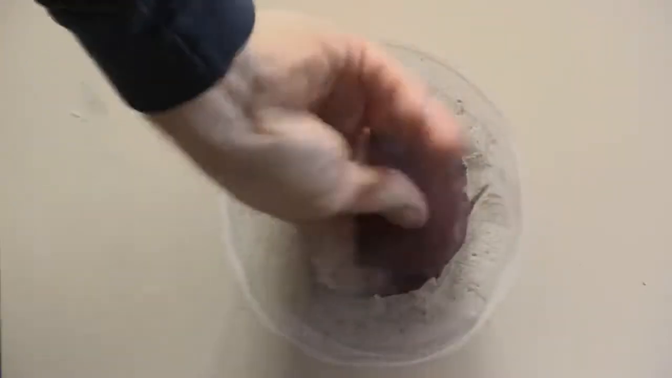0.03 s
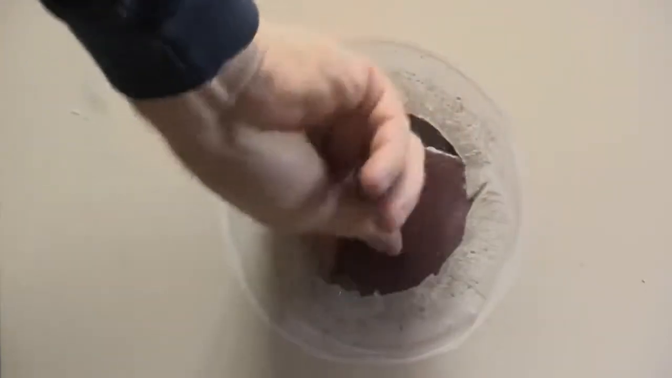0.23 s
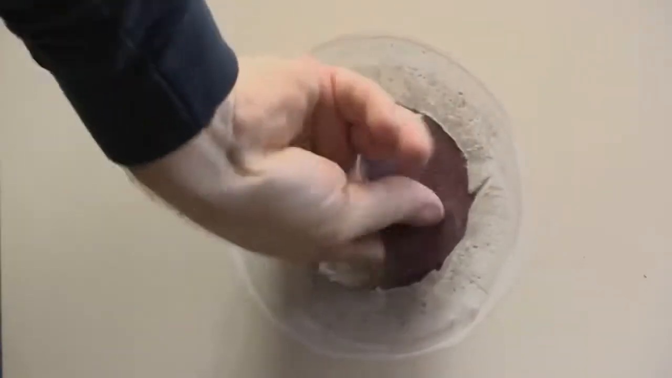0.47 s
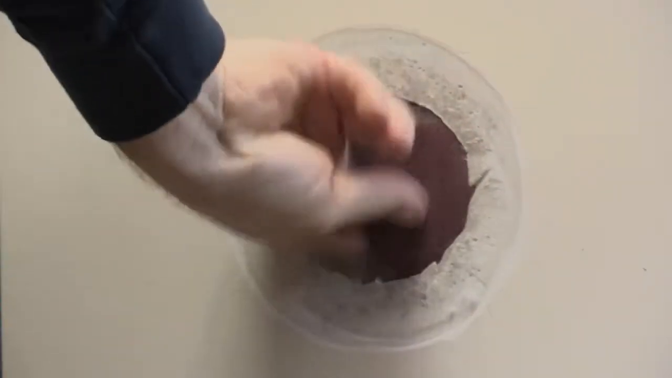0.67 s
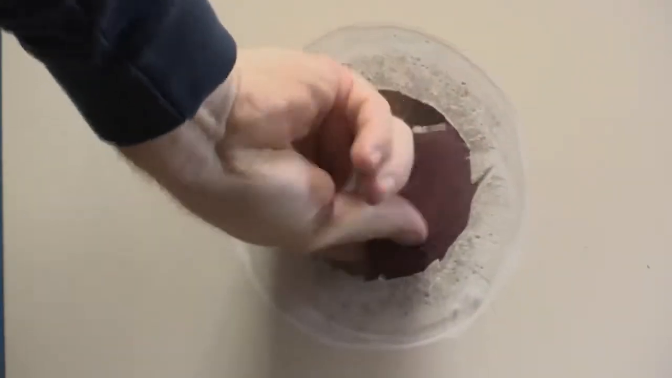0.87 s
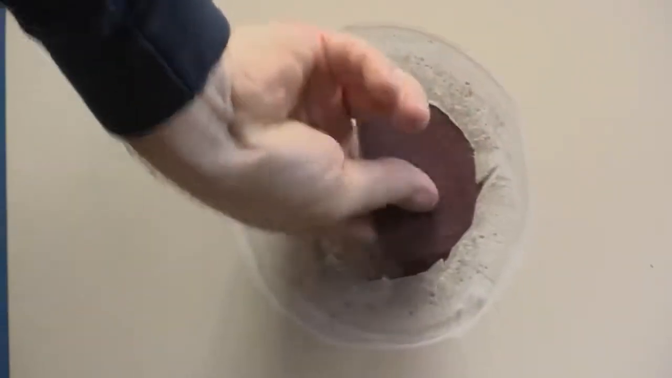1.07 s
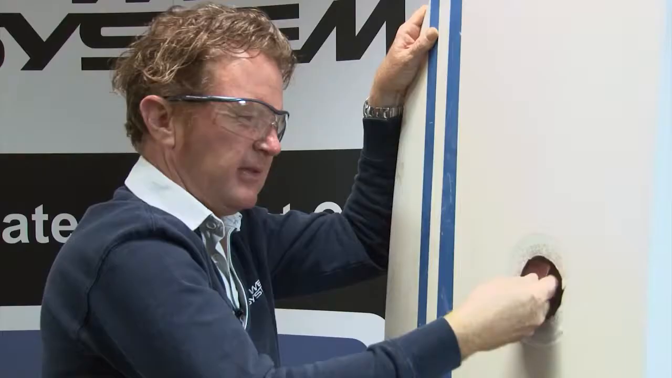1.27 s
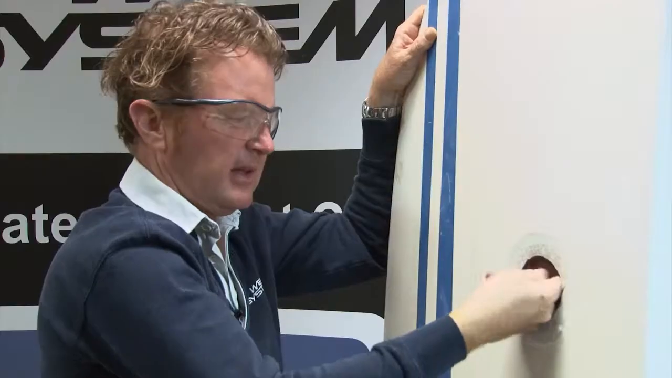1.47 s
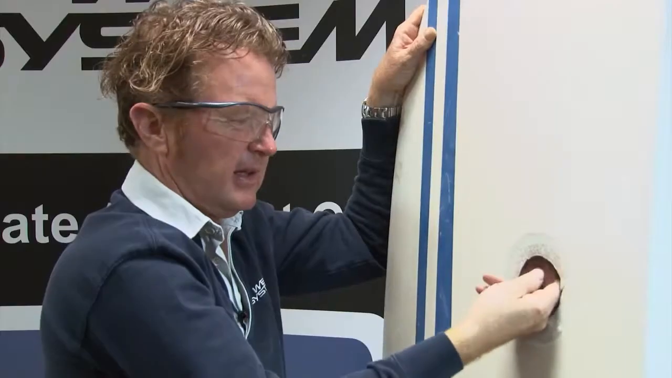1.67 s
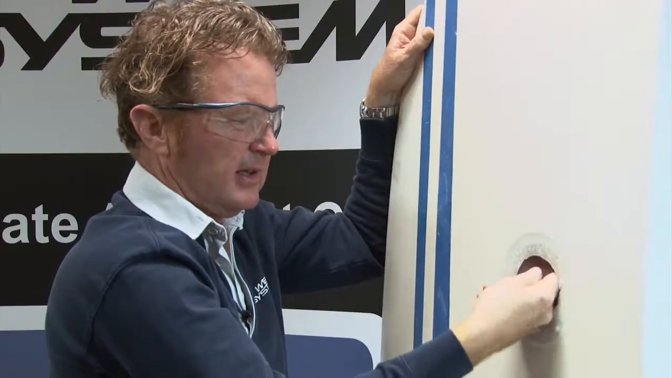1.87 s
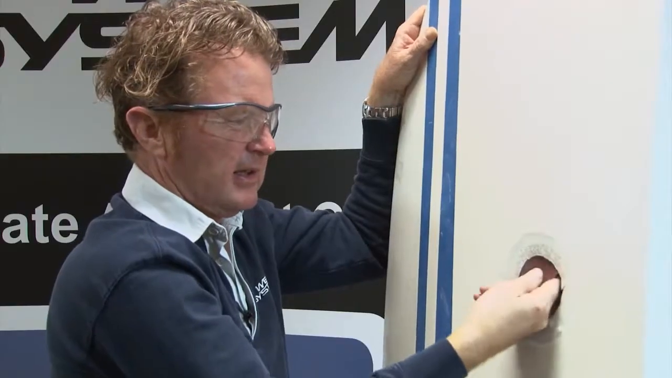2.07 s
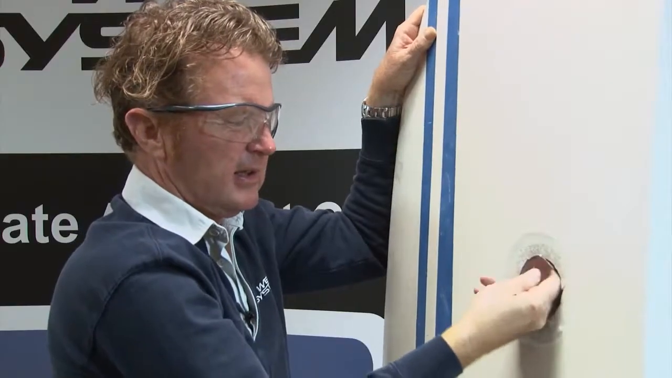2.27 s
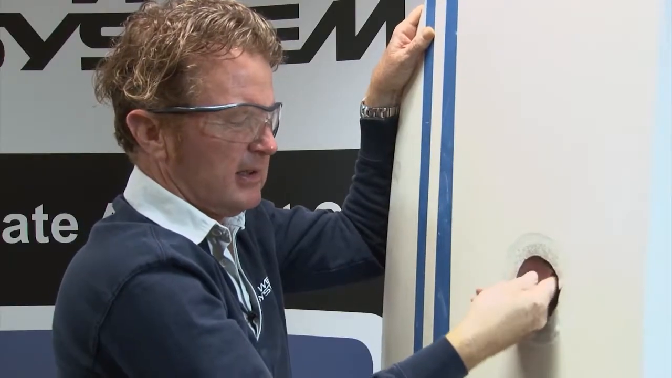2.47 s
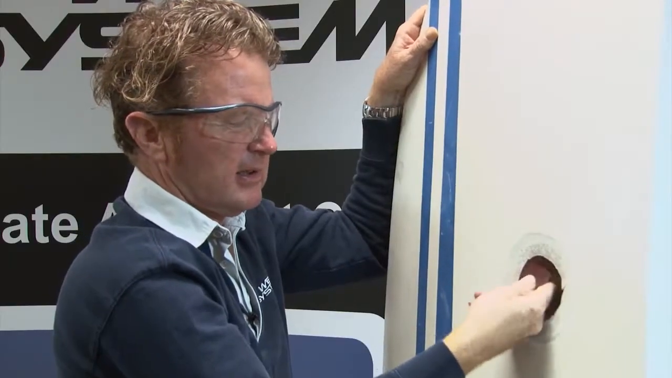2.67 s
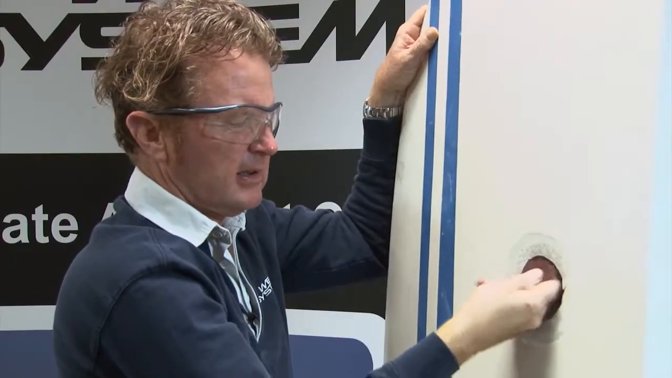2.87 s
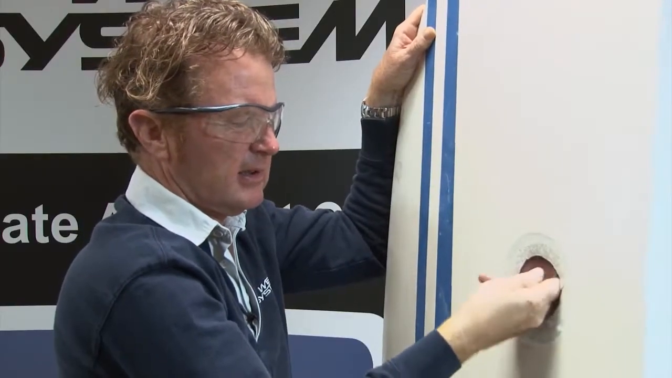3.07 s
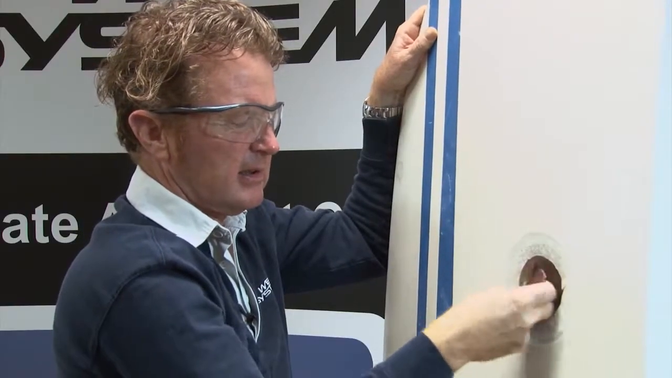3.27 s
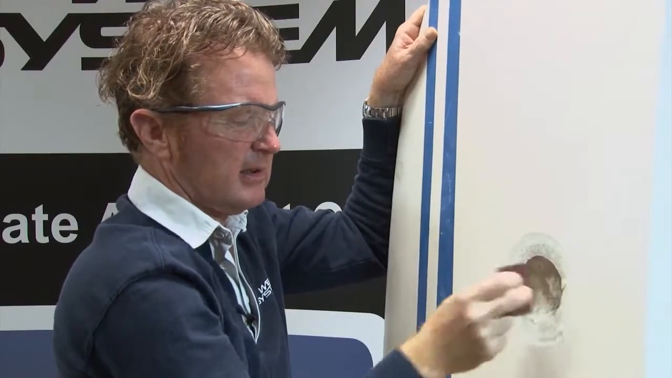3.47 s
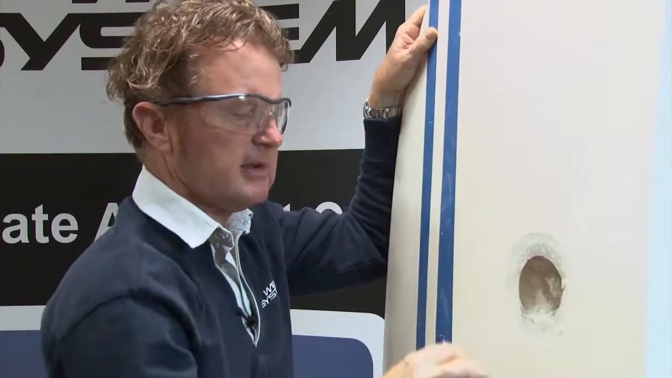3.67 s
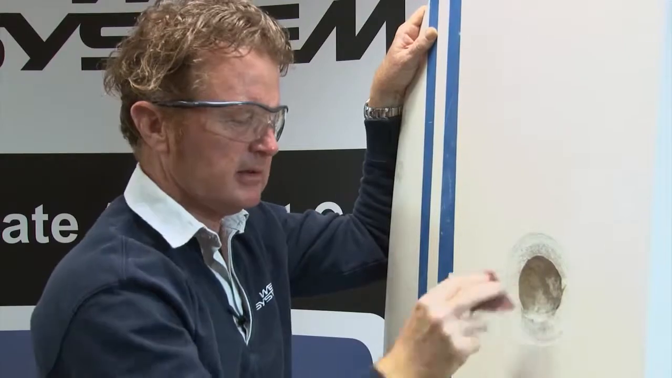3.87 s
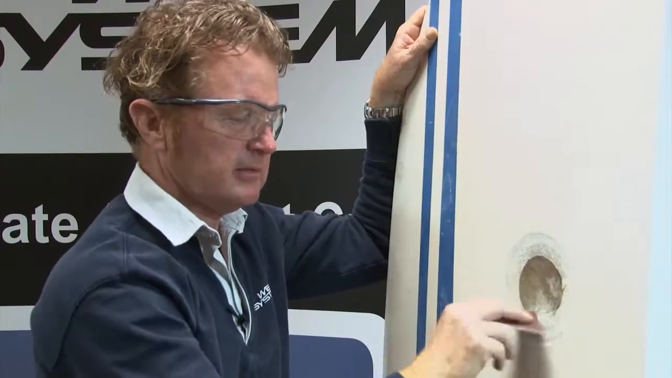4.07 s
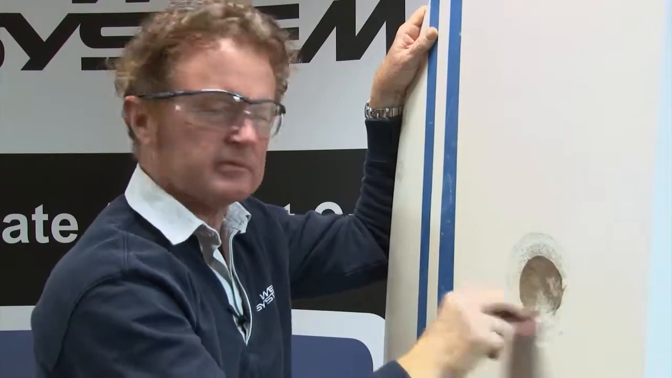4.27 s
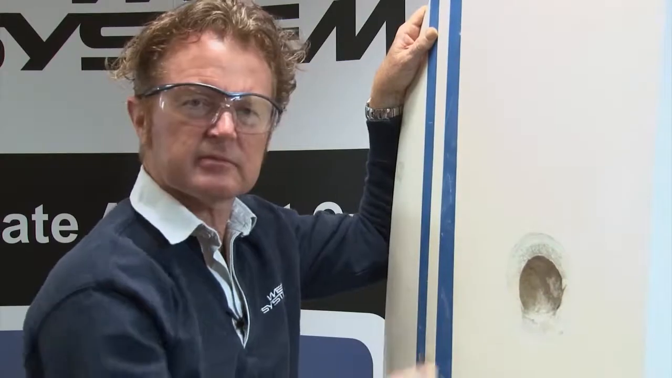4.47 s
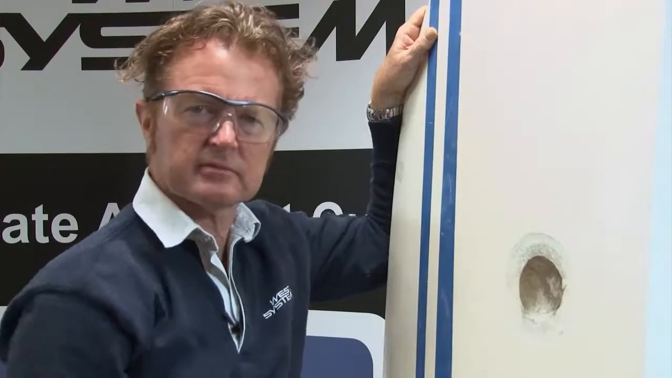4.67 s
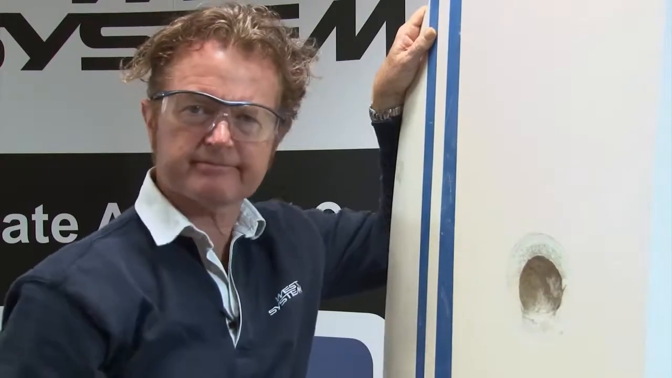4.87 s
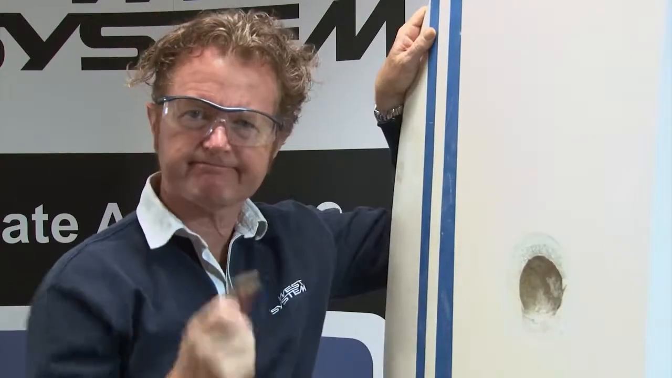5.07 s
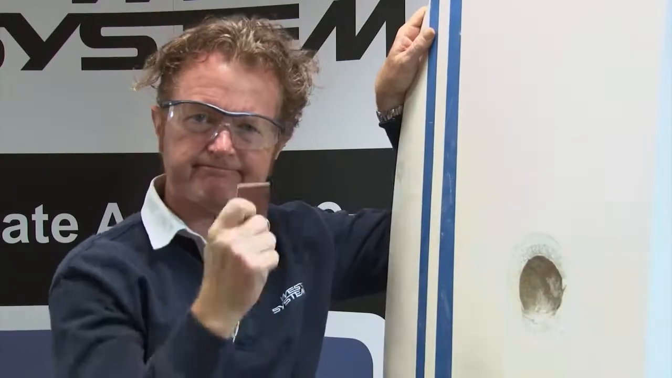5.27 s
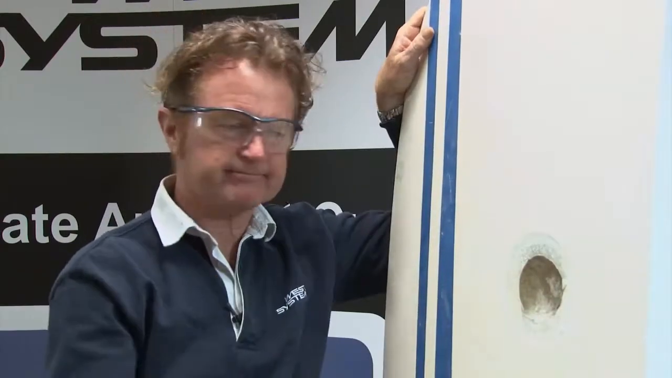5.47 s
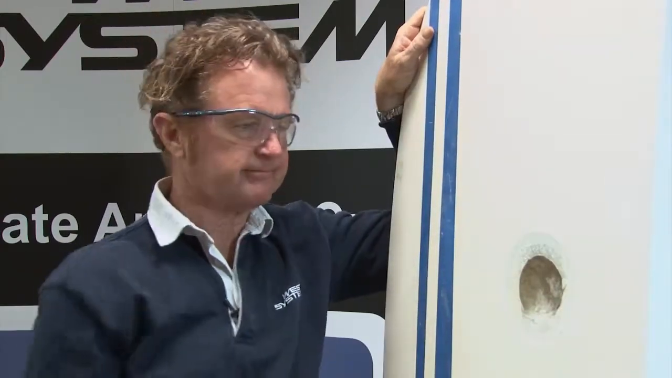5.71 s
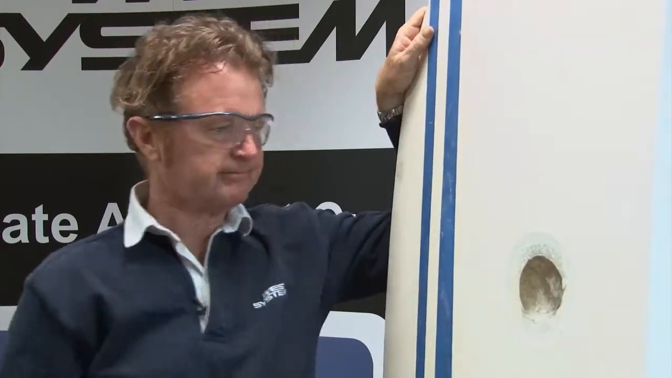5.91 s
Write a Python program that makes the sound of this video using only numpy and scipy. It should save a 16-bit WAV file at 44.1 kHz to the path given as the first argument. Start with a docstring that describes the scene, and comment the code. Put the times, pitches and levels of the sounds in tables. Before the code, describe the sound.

A close chest-worn microphone in a small, slightly echoing workshop with quiet steady hiss. From 0.1 s sandpaper rubs a hard hollow panel in short, irregular gritty strokes, soft at first. From about 0.7 to 1.1 s they are brightest and hissiest, with dull knocks of the panel; until 2.1 s they are weaker and scratchy, with occasional clicks. From 2.15 s the grit catches harder: sharp snaps and hollow, ringing scrapes, strongest around 2.2 and 2.5 s, continuing in separate strokes until 3.5 s. A faint low boom swells and fades beneath. At 3.7 s there is a soft bump and cloth rustle, then a light tap. Two short, hollow wipes come at about 4.15 and 4.35 s, each with a low thud. Afterwards only faint clothing rustle, tiny ticks from 4.7 s, a crisper tick near 5.4 s, and a soft rustling bump at 5.8 s.

```python
"""A hand rubs sandpaper round the ragged edge of a hole in a fibreglass panel, stops, then wipes the edge twice.
Grit catches and slips: one stream of random grains is heard as hiss and rings paper, rim and panel filters.
A low boom swells and fades underneath; bumps and room hiss are filtered noise, and cloth rustle is fine grains.
Ticks, taps and sharp clicks are short noise bursts. A chest-worn microphone hears it all, with a room echo."""
import sys
import numpy as np
from scipy import signal
from scipy.fft import rfft, irfft, next_fast_len
from scipy.io import wavfile
from scipy.ndimage import uniform_filter1d

SR = 44100
rng = np.random.default_rng(int(sys.argv[2]) if len(sys.argv) > 2 else 0)


def bounce(signal):
    """Save signal as a 16-bit WAV file at the path given by the first command-line argument."""
    frames = np.transpose(np.atleast_2d(signal))
    limited = np.clip(frames, -1, 1)
    pcm = np.round(limited * 32767).astype(np.int16)
    wavfile.write(sys.argv[1], SR, pcm)


N = 262152

# Where the paper presses: (time [s], rasp level [dB], panel level against rim [dB],
# tilt of the drive of the paper and rim modes [dB per octave], tilt of the panel's [dB per octave])
SPOT = [(0, -32, 11, -9, -5), (.25, -3, 10, -2, -1.5), (.6, -5, 4.5, -1.5, -5), (.9, -6.5, 1, -3, 1),
        (1.1, -6.5, 3.5, -3.5, 5), (1.4, -4.5, -2.5, 1, 4.5), (1.68, -7, 7.5, 0, 1),
        (1.9, -5.5, -7, 0, -5.5), (2.2, -4.5, -7.5, -5, -4.5), (2.6, -7.5, -6.5, -5.5, -2),
        (3.0, -3.5, -2.5, -1.5, 2), (3.5, 3, 7, 1.5, -1), (4.2, 1.5, 6, 6, 0.5), (4.38, 6, 5, 5, 4.5)]


def amp(db):
    """Turn decibels into gain, as the ear judges loudness by ratios."""
    return 10 ** (np.asarray(db) / 20)


def rms_one(x):
    """Scale a sound to an average strength (rms) of 1."""
    return x / np.sqrt(np.mean(x ** 2) + 1e-20)


def in_time(rows):
    """Draw straight lines between the rows of a time table, giving each column at every sample."""
    s, *columns = np.transpose(rows)
    return np.array([np.interp(np.arange(N) / SR, s, column) for column in columns])


def lag(x, seconds):
    """Smooth a signal so that it takes time to follow a change."""
    r = np.exp(-1 / (seconds * SR))
    return signal.lfilter([1 - r], [1, -r], x)


def flicker(rate):
    """Slow random wandering with a spread of 1; a higher rate [Hz] wanders faster."""
    r = np.exp(-2 * np.pi * rate / SR)
    noise = rng.standard_normal(N + 4000)
    wander = signal.lfilter([1], [1, -2 * r, r * r], noise)
    return rms_one(wander[4000:])  # drop the settling time of the filter


def signs():
    """Random plus or minus for every sample."""
    return rng.choice([-1, 1], N)


def bandpass(x, low_hz, high_hz):
    """Keep mainly the pitches between two frequencies."""
    return signal.sosfilt(signal.butter(2, [low_hz, high_hz], "band", fs=SR, output="sos"), x)


def coloured(x, spectrum):
    """Filter x by a table of pitch and level, falling away steeply outside the table."""
    hz, level_db = np.transpose(spectrum)
    grid = np.log(np.arange(N // 2 + 1) * SR / N + 1e-9)
    below = np.maximum(np.log(hz[0]) - grid, 0)
    above = np.maximum(grid - np.log(hz[-1]), 0)
    gain_db = np.interp(grid, np.log(hz), level_db) - 54 * (below + above)
    return irfft(rfft(x) * amp(gain_db), N)


def resonate(x, modes, tilt_db=0, wander_db=0):
    """Parallel resonances, each driven with its own random signs and by a level that tilts and wanders."""
    out = np.zeros(N)
    middle = np.mean(np.log2(np.array(modes)[:, 0]))
    for hz, width, level_db in modes:
        r = np.exp(-np.pi * width / SR)  # a narrow mode rings longer
        b = (1 - r * r) / 2 * np.array([1, 0, -1])
        a = [1, -2 * r * np.cos(2 * np.pi * hz / SR), r * r]
        octaves = np.log2(hz) - middle
        drive_db = level_db + tilt_db * octaves + wander_db * flicker(7.3)
        out += signal.lfilter(b, a, x * signs() * amp(drive_db))
    return out


def swells(rows):
    """Power of bell-shaped swells, from rows of time, length and level."""
    t = np.arange(N) / SR
    return sum(amp(db) ** 2 * np.exp(-((t - s) / length) ** 2) for s, length, db in rows)


def grit(per_s, spread_db, clump_db):
    """Grains break loose at random with uneven sizes, in clumps a few ms long; rms 1."""
    sizes = amp(spread_db * np.minimum(rng.exponential(1, N), 4)) * signs()
    grains = sizes * (rng.random(N) < per_s / SR)
    return rms_one(grains * amp(clump_db * flicker(190)))


def contact():
    """Strength of hiss, rasp, rim ring and panel ring in time; slips, light drag and knocks add as powers."""
    # slips of the grit: (start [s], length [s], level change over the slip [dB],
    # fine hiss level [dB], ring level [dB])
    slips = [(0.115, 0.014, -21, -49.5, -43), (0.247, 0.032, -18, -50, -45),
             (0.288, 0.052, 0.5, -60, -52.5), (0.399, 0.031, 5.5, -50, -45), (0.495, 0.044, -7, -46, -44.5),
             (0.531, 0.049, 3, -41, -40), (0.611, 0.04, -27, -40.5, -40), (0.675, 0.03, 20, -40, -47),
             (0.708, 0.027, 1, -23.5, -31), (0.754, 0.0048, -3.5, -21, -32), (0.83, 0.03, -3, -24.5, -30.5),
             (0.874, 0.057, -9.5, -40.5, -35.5), (0.993, 0.0018, 0, -39.5, -39),
             (1.003, 0.03, 15.5, -30.5, -37.5), (1.06, .02, -9.5, -24, -29), (1.103, 0.041, -51, -31, -33),
             (1.156, 0.054, 14, -38.5, -39.5), (1.226, 0.032, -8, -38.5, -33.5),
             (1.316, 0.017, -10, -52, -41), (1.341, 0.044, -2, -30, -29), (1.427, 0.018, -31, -28, -57),
             (1.466, 0.031, -4.5, -37.5, -48), (1.51, 0.041, 2, -43, -43), (1.663, 0.023, -14.5, -40, -41),
             (1.741, 0.019, -8, -45, -36.5), (1.776, 0.023, -26, -37, -47), (1.791, 0.058, -12, -42, -43),
             (1.893, 0.018, -14.5, -40, -41), (1.911, 0.05, -3, -40, -38.5),
             (1.991, 0.028, 2.5, -49, -51.5), (2.032, 0.013, 2, -42.5, -34.5),
             (2.091, 0.03, 8.5, -52.5, -52), (2.152, 0.0094, -20.5, -56, -27.5),
             (2.173, 0.011, -13.5, -27.5, -15.5), (2.185, 0.0031, -1, -31, -20.5),
             (2.216, 0.0029, -10.5, -35.5, -9.5), (2.235, 0.0073, -5.5, -16, -11.5),
             (2.3, .025, 11.5, -42.5, -37), (2.324, 0.022, -9, -37, -27.5), (2.351, 0.043, -16, -44, -36),
             (2.38, 0.033, -10.5, -37, -33.5), (2.456, 0.011, -26, -64, -44),
             (2.477, 0.018, -15.5, -23, -11), (2.525, .007, -3, -39, -34.5), (2.582, 0.01, -5, -36, -27),
             (2.664, 0.012, -6.5, -44.5, -41.5), (2.702, 0.016, -17.5, -50, -38),
             (2.739, 0.023, -2, -29.5, -23.5), (2.793, 0.011, -16, -44, -51.5),
             (2.827, 0.016, 6, -54, -46.5), (2.856, 0.0073, -4, -43.5, -35), (2.956, 0.014, 5.5, -36, -24),
             (2.99, 0.022, -13.5, -38.5, -18.5), (3.053, 0.061, -25, -29, -25.5),
             (3.105, 0.063, -9.5, -38.5, -38), (3.178, 0.047, -9, -43, -28), (3.25, 0.035, -1, -40, -31),
             (3.298, 0.014, -14, -40, -29), (3.373, 0.023, -11, -47, -29.5), (3.433, 0.034, -24, -49, -26),
             (3.469, 0.026, -8, -52, -27), (4.125, 0.022, 11, -74, -54.5), (4.153, 0.042, 3, -46, -45),
             (4.183, 0.02, 2, -35.5, -30.5), (4.201, 0.083, -32.5, -38, -30), (4.331, .02, 1, -62, -40),
             (4.353, 0.028, 10.5, -42, -30), (4.369, 0.081, -38, -39.5, -23)]
    # light contact of the paper between slips: (time [s], level [dB])
    drag = [(0, -73.5), (.3, -63), (.66, -56.5), (1.2, -55.5), (1.52, -53), (1.8, -67.5), (2.1, -55.5),
            (2.5, -52.5), (2.9, -58), (3.2, -56), (3.5, -63), (3.62, -75), (4.12, -90), (4.3, -63.5),
            (4.45, -53.5), (4.65, -85)]
    # added to the drag level: one value each for hiss, rasp, rim ring, panel ring [dB]
    drag_parts_db = [-4, -4.5, -2.5, 9]
    # knuckles or the paper's backing push the panel: (time [s], level [dB])
    knocks = [(0.112, -34), (.86, -28.5), (1.08, -27.5), (1.672, -32.5), (1.748, -38), (2.49, -33),
              (3.002, -30.5), (3.39, -38), (4.206, -25), (4.399, -26)]
    rise_s, rise_share = 0.00086, 0.065  # longer slips also set in more slowly
    fall_t60_s, knock_t60_s = 0.041, 0.19  # time to die by 60 dB
    rasp_from_hiss = 0.57  # the rasp starts from a level between hiss and ring

    power = amp(in_time(drag) + np.array(drag_parts_db)[:, None]) ** 2
    rasp_db, panel_db, *_ = in_time(SPOT)
    t = np.arange(int(.3 * SR)) / SR
    for start, length, change_db, hiss_db, ring_db in slips:
        at = round(start * SR)
        change = change_db * np.clip(t / length, 0, 1)
        fall = 60 * np.maximum(t - length, 0) / fall_t60_s
        rise = np.minimum(t / (rise_s + rise_share * length), 1)
        shape = rise * amp(change - fall)
        between_db = rasp_from_hiss * hiss_db + (1 - rasp_from_hiss) * ring_db
        levels_db = [hiss_db, between_db + rasp_db[at], ring_db, ring_db + panel_db[at]]
        power[:, at:at + len(t)] += (amp(levels_db)[:, None] * shape) ** 2
    for s, db in knocks:
        at = round(s * SR)
        power[-1, at:at + len(t)] += amp(db - 60 * t / knock_t60_s) ** 2  # panel only
    return np.sqrt(power)


def patchy(x):
    """The colour shifts as the paper bends: each band's strength wanders by itself."""
    # neighbouring edges of the hiss bands: (edge [Hz])
    edges = [3000, 6780, 8290, 10560, 13500, 17000]
    out = np.zeros(N)
    for k, (low_hz, high_hz) in enumerate(zip(edges, edges[1:])):
        band = amp(1 * flicker(14)) * bandpass(x, low_hz, high_hz)  # wanders by 1 dB
        out += band * (-1) ** k  # turned over so that neighbours add where they meet
    return out


def sanding(strengths):
    """One stream of grains is heard directly as hiss and through the modes of paper, rim and panel."""
    # colour of the hiss: (frequency [Hz], level [dB per Hz])
    hiss_colour = [(3530, -26), (6000, -2.5), (7550, -5.5), (8700, 3), (10600, 1), (13400, -11),
                   (15400, -20.5), (16100, -22.5), (16300, -15)]
    # resonances of paper, rim and panel: (frequency [Hz], width [Hz], level [dB])
    paper = [(2130, 280, 3), (2730, 550, -6.5), (3413, 1300, 4), (4290, 350, 0.5), (5260, 1100, 2),
             (6900, 670, -13)]
    rim = [(670.4, 50, -2), (768, 82, 1.5), (906, 32, -1.5), (960, 110, -5), (1177, 200, -1),
           (1335, 91, -13.5), (1472, 49, -2), (1701, 130, -6.5)]
    panel = [(190.5, 19, -1), (240, 17, -1.5), (276.3, 14, 1), (341, 29, 0), (420.2, 32, -5.5),
             (534, 52, -5.5), (620, 18, -7.5)]
    grip_s = 0.0034  # the paper takes this long to load up
    low_cut_hz = 100  # the scrape has little sound below this

    grains = grit(per_s=9000, spread_db=3.5, clump_db=2.0)
    fine, *pressed = lag(strengths, grip_s)
    out = patchy(coloured(grains * fine, hiss_colour)) / np.std(coloured(grains, hiss_colour))
    *_, upper_db, lower_db = in_time(SPOT)
    tilts_db = [upper_db, upper_db, lower_db]
    for modes, strength, tilt_db in zip([paper, rim, panel], pressed, tilts_db):
        ringing = resonate(grains * strength, modes, tilt_db, wander_db=2.5)
        out += ringing / np.std(resonate(grains, modes))  # level against steady grains
    return signal.sosfilt(signal.butter(3, low_cut_hz, "high", fs=SR, output="sos"), out)


def boom():
    """A low panel boom near 93 Hz, ringing from noise, that swells and fades by its own level table."""
    # the mode: (frequency [Hz], width [Hz], level [dB])
    lowest_mode = [(93, 11, 0)]
    # strength of the boom: (time [s], level [dB])
    boom_levels = [(0, -61), (.3, -45), (.5, -50), (1.6, -58.5), (1.7, -44.5), (1.9, -56), (2.2, -44),
                   (2.7, -46), (3.3, -40.5), (3.8, -68), (4.0, -55.5), (4.3, -54), (4.38, -42),
                   (4.5, -47.5), (4.9, -68.5), (5.94, -65.5)]
    tone = bandpass(resonate(rng.standard_normal(N), lowest_mode), 70, 125)
    nearby_power = uniform_filter1d(tone ** 2, size=1400)
    evened = tone / (nearby_power + 0.12 * np.var(tone)) ** 0.38  # fairly even before the table
    return amp(in_time(boom_levels)[0]) * rms_one(evened)


def bumps():
    """Lumpy low noise through body and cloth, stronger during the first long rubbing, swelling at each bump."""
    # low bumps: (time [s], level at the top of the swell [dB])
    bump_times = [(.15, -41), (.32, -47), (1.39, -45), (2.75, -45), (3.319, -47), (3.67, -43.5),
                  (4.04, -47.5), (4.499, -46.5), (5.25, -46), (5.72, -54), (5.79, -39.5), (5.87, -55)]
    # colour of the low noise: (frequency [Hz], level [dB per Hz])
    rumble_colour = [(8.8, -26.5), (15, 3), (96, -3), (118, -24), (140, -3), (180, -38), (310, -120)]
    bump_s, rubbing_ends_s = 0.042, 3.65
    rubbing_db, later_db = -50, -56.5
    floor_db = np.where(np.arange(N) / SR < rubbing_ends_s, rubbing_db, later_db)
    power = lag(amp(floor_db) ** 2, 0.11)
    power += swells([(s, bump_s, db) for s, db in bump_times])
    noise = rms_one(coloured(rng.standard_normal(N), rumble_colour))
    return np.sqrt(power) * amp(1.5 * flicker(6)) * noise


def room_hiss():
    """Steady room hiss: random noise given a fixed colour."""
    # colour of the room: (frequency [Hz], level [dB per Hz])
    room_colour = [(76, -14.5), (130, -6.5), (268, -1.5), (328, -11), (522, -11.5), (1290, -19.5),
                   (9870, -25), (12300, -30), (13100, -31.5), (14200, -51.5), (16000, -66.5)]
    return amp(-63.5) * rms_one(coloured(rng.standard_normal(N), room_colour))


def cloth():
    """Cloth rustles as the arm moves: clumped fine grains swell and fade."""
    # rustles: (time of the middle [s], length [s], level [dB])
    rustles = [(0.02, 0.017, -61), (3.67, 0.072, -56.5), (3.85, 0.081, -63), (4.55, 0.13, -57),
               (4.75, 0.11, -59.5), (5.1, 0.18, -62.5), (5.42, 0.067, -74), (5.76, 0.027, -56),
               (5.8, 0.055, -61)]
    # colour of the cloth: (frequency [Hz], level [dB per Hz])
    cloth_colour = [(150, 10.5), (400, -2.5), (1100, -6.5), (2200, -9), (5500, -13), (10000, -15),
                    (13000, -23)]
    grains = grit(per_s=9400, spread_db=0.5, clump_db=2.5)
    return np.sqrt(swells(rustles)) * rms_one(coloured(grains, cloth_colour))


def burst(s, peak_db, low_hz, high_hz, decay):
    """A small impact is a short dying burst of band noise at time s."""
    out, at = np.zeros(N), round(s * SR)
    dying = rng.standard_normal(1500) * np.exp(-np.arange(1500) / SR / decay)
    sound = bandpass(dying, low_hz, high_hz)
    out[at:at + 1500] = amp(peak_db) * sound / np.abs(sound).max()
    return out


def ticks():
    """Ticks and taps have a pitch of their own from a narrow band; sharp clicks are broad and dry."""
    # small ticks of paper or cloth:
    # (time [s], peak level [dB], pitch [Hz], decay [s], band edge against pitch [ratio])
    small_ticks = [(3.848, -48, 5800, 0.0029, 1.8), (4.6997, -48.5, 3360, 0.0066, 1.1),
                   (4.773, -47, 3450, 0.0037, 1.04), (4.7975, -46, 3280, 0.0076, 1.13),
                   (4.822, -44, 5220, 0.0054, 1.1), (4.8215, -40.5, 3240, 0.0073, 1.16),
                   (4.863, -53, 5950, 0.0049, 1.1), (4.9488, -46, 3990, 0.0059, 1.6),
                   (5.113, -49, 4170, 0.0038, 1.6), (5.1492, -47, 5100, 0.0052, 1.23),
                   (5.216, -46, 5460, 0.0027, 1.7), (5.3657, -31, 6960, 0.0012, 1.4),
                   (5.4402, -48, 6850, 0.0043, 1.4)]
    # soft finger taps: (time [s], peak level [dB], pitch [Hz], decay [s], band edge against pitch [ratio])
    taps = [(3.802, -45.5, 382, 0.0058, 1.145), (5.011, -51, 380, 0.014, 1.14)]
    # sharp clicks, mostly where a slip of the grit sets in: (time [s], peak level [dB])
    clicks = [(0.2935, -35), (0.4, -30.5), (0.498, -26.5), (0.7587, -28), (0.829, -22), (1.162, -38),
              (1.43, -24.5), (1.7471, -20.5), (1.781, -37), (1.803, -32), (2.194, -16.5), (2.1827, -17),
              (2.237, -18), (2.479, -17), (2.7018, -23), (2.855, -18), (2.963, -26), (3.3776, -15),
              (4.1313, -41), (4.145, -34.5), (4.337, -33), (4.9514, -53)]
    out = np.zeros(N)
    for s, db, hz, decay, ratio in small_ticks + taps:
        ratio = max(ratio, 1.03)  # the narrowest band allowed
        out += burst(s, db, hz / ratio, hz * ratio, decay)
    for s, db in clicks:
        out += burst(s, db, 1200, 13000, decay=0.00085)
    return out


def workshop(x):
    """Room echo: ten feedback delays, weaker and duller on every round."""
    t60_s, wall_cut_hz = 0.27, 1800  # time to die by 60 dB at low pitch; treble is lost above the cut
    size = next_fast_len(N + SR)
    w = 2 * np.pi * np.arange(size // 2 + 1) / size
    dull = 1 / (1 + 1j * w * SR / (2 * np.pi * wall_cut_hz))
    loops = 0
    for delay in np.geomspace(.017, .052, 10) * SR:
        once = amp(-60 * delay / SR / t60_s) * dull * np.exp(-1j * w * delay)
        loops = loops + once / (1 - once)  # all rounds added up
    return irfft(rfft(x, size) * loops, size)[:N]


def scene():
    """Add the room echo to sanding, ticks and cloth, then the low sounds and hiss."""
    near = sanding(contact()) + ticks() + cloth()
    echo = amp(-15) * workshop(near)
    low = bumps() + boom()
    return (near + echo + low + room_hiss())[None]


def record(dry):
    """A steep filter removes the very top of the treble."""
    cutoff_hz = 16450
    return signal.sosfilt(signal.cheby2(12, 70, cutoff_hz, fs=SR, output="sos"), dry)


dry = scene()
out = record(dry)
bounce(out)
```